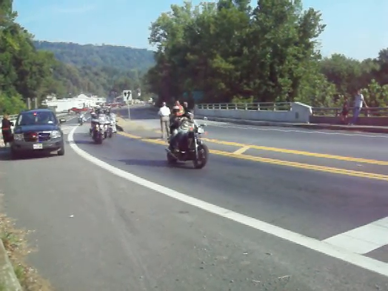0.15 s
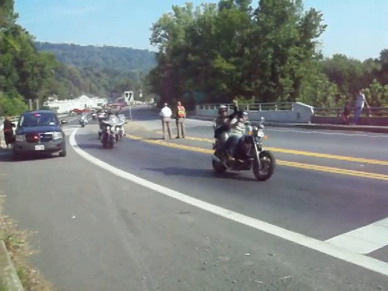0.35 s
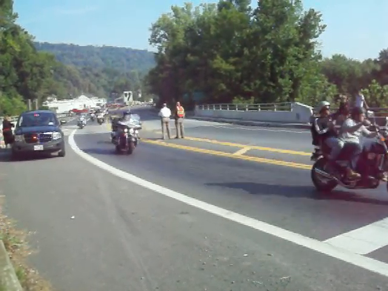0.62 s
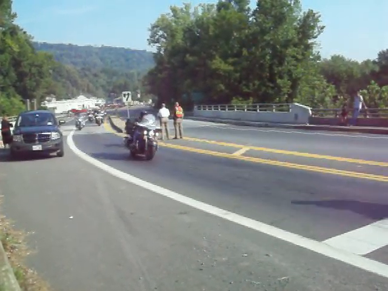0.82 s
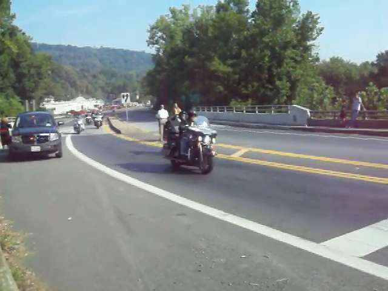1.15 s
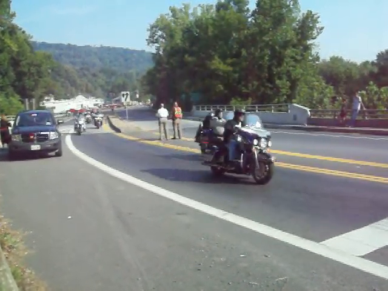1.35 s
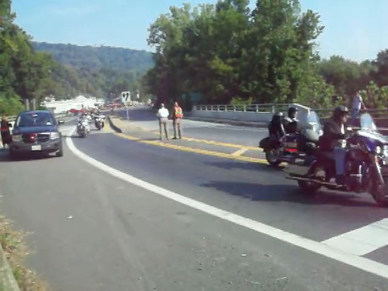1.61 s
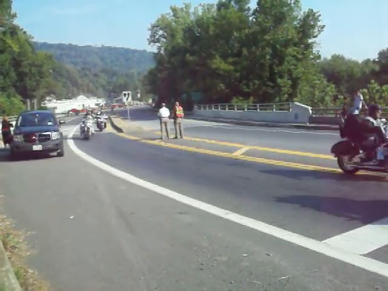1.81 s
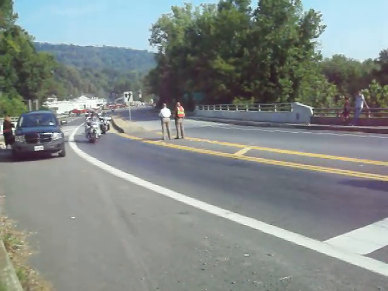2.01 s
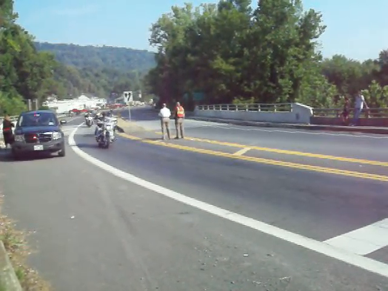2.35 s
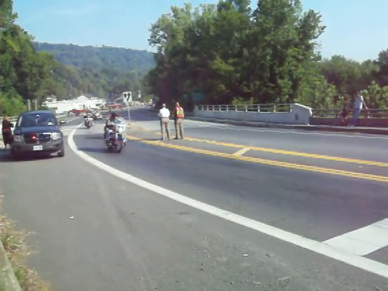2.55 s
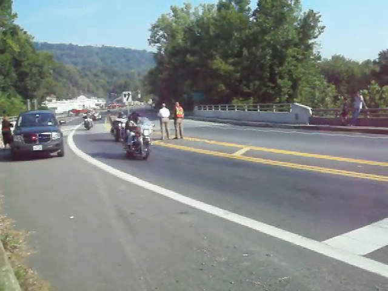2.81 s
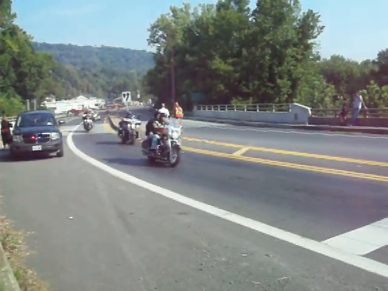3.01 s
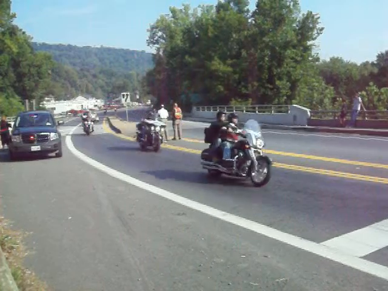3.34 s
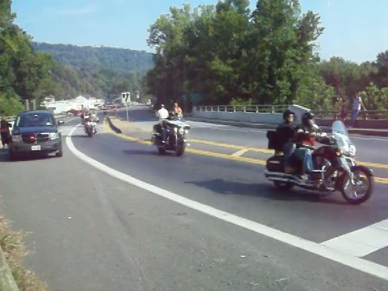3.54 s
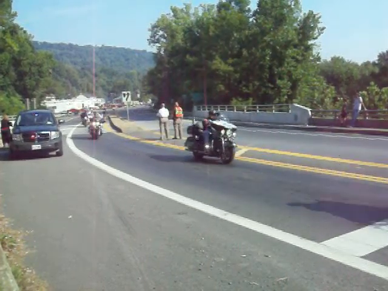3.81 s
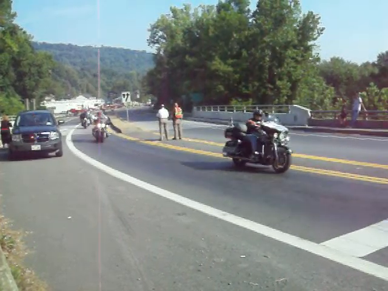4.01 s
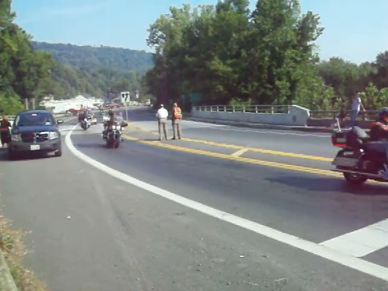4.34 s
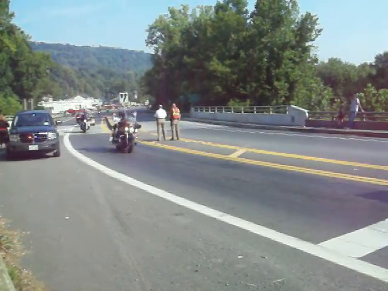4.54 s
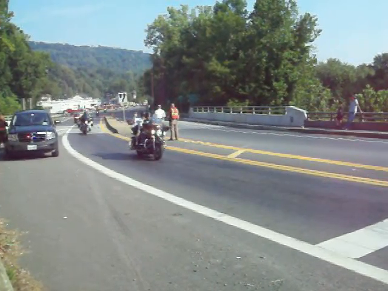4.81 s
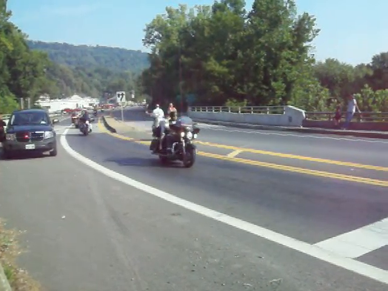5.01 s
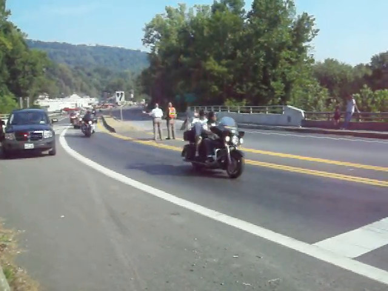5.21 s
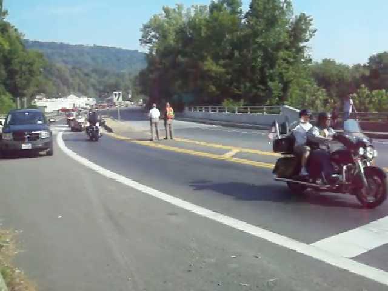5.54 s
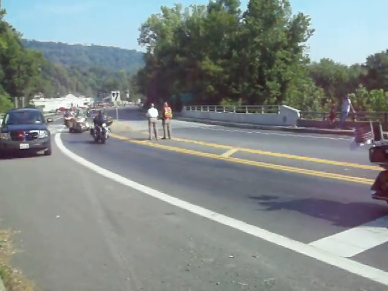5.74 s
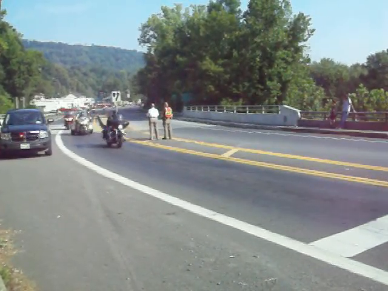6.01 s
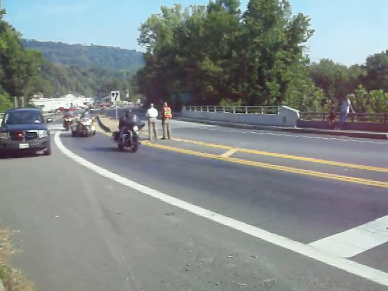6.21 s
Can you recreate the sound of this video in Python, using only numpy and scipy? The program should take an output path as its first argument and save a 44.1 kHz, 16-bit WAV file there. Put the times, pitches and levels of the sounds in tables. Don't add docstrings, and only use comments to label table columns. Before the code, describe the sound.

A column of heavy twin-cylinder motorcycles thunders by at a roadside bend, lumpy throbbing engines overlapping, distorted and continuous, over distant rumble.

```python
import sys
import numpy as np
from scipy import signal
from scipy.fft import rfft, irfft, next_fast_len
from scipy.io import wavfile
from scipy.ndimage import uniform_filter1d, map_coordinates

SR = 44100
rng = np.random.default_rng(int(sys.argv[2]) if len(sys.argv) > 2 else 0)


def how_loud(loudness_db):
    steps = np.asarray(loudness_db, float) / 20
    return 10 ** steps


def unload_audio(sound):
    columns = np.transpose(np.atleast_2d(sound))
    steps = np.round(np.clip(columns, -1, 1) * 32767)
    wavfile.write(sys.argv[1], SR, steps.astype(np.int16))


N = 281358
T = np.arange(N) / SR


def unit(x):
    return x / np.sqrt(np.mean(x ** 2) + 1e-20)


def along(points, hz):
    f, v = np.transpose(points)
    return np.interp(np.log(hz + 1), np.log(f + 1), v)


def curve(points):
    s, value = np.transpose(points)
    return np.interp(T, s, value)


def wobble(rate):
    coarse = np.arange(0, N + 32, 32)
    knots = rng.standard_normal(int(N * rate / SR) + 4)
    smooth = map_coordinates(knots, [coarse * rate / SR])
    return np.interp(np.arange(N), coarse, smooth)


def filtered(x, response):
    m = next_fast_len(N + SR // 4)
    return irfft(rfft(x, m) * response(np.fft.rfftfreq(m, 1 / SR)), m)[:N]


def noise(spectrum):
    return unit(filtered(rng.standard_normal(N), lambda hz: how_loud(along(spectrum, hz))))


def ring(hz, width_hz):
    return lambda f: 1j * f * width_hz / (hz * hz - f * f + 1j * f * width_hz)


def through(blows, response):
    early = 512
    pulse = np.roll(irfft(response(np.fft.rfftfreq(4096, 1 / SR))), early)
    return signal.oaconvolve(blows, pulse)[early:][:N]


def spell(start, end, rise, fade):
    return -rise * np.maximum(start - T, 0) - fade * np.maximum(T - end, 0)


# time in seconds, speed in cycles a second.
FIRST_SPEED = [(0, 21.65), (0.4, 22.6), (0.8, 23.65), (1.25, 24.54), (1.9, 26.0)]
SECOND_SPEED = [(.9, 21.6), (1.35, 21.7), (1.8, 21.1), (2.2, 18), (2.5, 16.8)]
THIRD_SPEED = [(1.9, 19.4), (2.6, 20), (3, 20.5), (3.5, 20.95), (4, 21.6), (4.5, 22.5), (5.1, 24.1),
               (5.6, 25.5), (5.8, 26.2), (6.38, 27.3)]
FOURTH_SPEED = [(2.4, 14.9), (3, 15.1), (3.6, 15.1), (4.1, 15.48), (4.5, 16.02), (4.95, 17.06), (5.5, 18.0),
                (6.38, 19.6)]
FIFTH_SPEED = [(2.3, 24.5), (2.8, 24.8), (3, 25.3), (3.4, 25.7), (3.6, 26.4), (4, 28.3), (4.6, 29.5)]
SIXTH_SPEED = [(4.9, 17.9), (5.25, 18.9), (5.6, 19.5), (6, 20.3), (6.38, 21.2)]
SEVENTH_SPEED = [(5.3, 15), (6.38, 14.5)]


def procession():
    return (bike(0, FIRST_SPEED, pipe(390, 0.002776, 1.3, 170, 1.5), lag=0.432,
                 rear_db=-1.1, rear_push=0.3, rasp_db=-11, tick_hz=3500, tick_db=-19)
            + bike(1, SECOND_SPEED, pipe(260, 0.00342, 1.6, 110, -18), lag=0.38,
                   rear_db=1, rear_push=0.48, rasp_db=-17, tick_hz=2500, tick_db=-36)
            + bike(2, THIRD_SPEED, pipe(390, 0.00267, 1.48, 150, -1.1), lag=0.43,
                   rear_db=-5, rear_push=0.57, rasp_db=-19, tick_hz=4230, tick_db=-22)
            + bike(3, FOURTH_SPEED, pipe(540, 0.00383, 0.81, 120, 3.1), lag=0.425,
                   rear_db=0.3, rear_push=1.05, rasp_db=-8.5, tick_hz=1800, tick_db=-35.5)
            + bike(4, FIFTH_SPEED, pipe(240, 0.0022, 2.2, 403, -6), lag=0.59,
                   rear_db=-10, rear_push=0.47, rasp_db=-28, tick_hz=4200, tick_db=-19.5)
            + bike(5, SIXTH_SPEED, pipe(500, 0.00271, 0.94, 135, 5), lag=0.43,
                   rear_db=0.5, rear_push=0.32, rasp_db=-4, tick_hz=1700, tick_db=-32)
            + bike(6, SEVENTH_SPEED, pipe(320, 0.0054, 0.29, 68, -2.3), lag=0.72,
                   rear_db=-11, rear_push=0.63, rasp_db=-10, tick_hz=2500, tick_db=-31))


def bike(place, speed, exhaust, lag, rear_db, rear_push, rasp_db, tick_hz, tick_db):
    cycles = turns(place, speed)
    puffs, ticks, swell = np.zeros(N), np.zeros(N), np.zeros(N)
    for shift, db, push in ((0, 0, 1), (lag, rear_db, rear_push)):
        turn = cycles - shift
        at = np.flatnonzero(np.diff(np.floor(turn)))
        chance = rng.standard_normal((len(at), 2))
        blows = np.zeros(N)
        blows[at] = how_loud(db + 2.4 * chance[:, 0])
        puffs += through(blows, lambda f: exhaust(f, push))
        ticks[np.minimum(at + 70, N - 1)] = how_loud(3 * chance[:, 1])
        swell += how_loud(db) * np.exp(-9 * ((0.06 - turn) % 1))
    exhaust_db, drone_db = loudness(place)
    chug = unit(puffs) + how_loud(rasp_db) * gas_rasp(swell) + how_loud(tick_db) * valves(place, ticks, tick_hz)
    rear = lambda f: exhaust(f, rear_push) * how_loud(rear_db)
    return how_loud(exhaust_db) * chug + how_loud(drone_db + 0.5) * drone(place, speed, cycles, exhaust, rear, lag)


FIRES = [.0446, 1.7468, 2.41, 3.7948, 3.003, 5.594, 5.51]


def turns(place, speed):
    cycles = np.cumsum(curve(speed)) / SR
    return cycles - cycles[round(FIRES[place] * SR)]


def pipe(puff_hz, echo_s, echo, boom_hz, boom_db):
    def response(f, push=1):
        puff = push * np.exp(-(f / puff_hz) ** 1.17)
        suck = echo * np.exp(-(f / (0.87 * puff_hz)) ** 1.04 - 2j * np.pi * f * echo_s)
        boom = how_loud(boom_db) * ring(boom_hz, 45)(f)
        return (puff - suck + boom) * (f / (f + 40)) ** 2
    return response


# start in seconds, end in seconds, exhaust level in dB, change in dB a second.
PASSES = [
    (0, 1.7, -20.5, -1),
    (1.05, 2.7, -21.5, 2),
    (2.08, 7.9, -21, -3),
    (2.58, 5.55, -27, 2.4),
    (2.38, 4.06, -28, 0),
    (5.05, 6.38, -24, -1.5),
    (5.5, 7.3, -34.5, 15.5),
]
# start in seconds, end in seconds, level of the fifth order in dB.
PULLS = [
    [(0, .45, -18), (.45, .85, -17.5), (.85, 1.2, -20.5), (1.2, 1.6, -23)],
    [(1.197, 1.75, -16.5), (1.8, 2.3, -19)],
    [(2.1, 2.9, -13.5), (2.9, 3.5, -15), (3.5, 4.1, -17.5), (4.1, 4.6, -16.5), (4.9, 5.3, -13),
     (5.7, 6.2, -17)],
    [(2.6, 3.05, -19), (3.05, 3.6, -18), (3.6, 4.2, -15.5), (4.2, 4.7, -18.5), (4.7, 5.3, -21),
     (5.3, 5.6, -16.5)],
    [(2.35, 3.1, -33.5), (3.2, 4.1, -31.5)],
    [(5.4, 5.8, -27), (5.8, 6.38, -25)],
    [(5.83, 6.05, -13.5)],
]


def loudness(place):
    start, end, db, change = PASSES[place]
    heard_db = spell(start, end, rise=89, fade=77.5)
    pulls_db = [level + spell(a, b, rise=52, fade=52) for a, b, level in PULLS[place]]
    exhaust_db = db + change * (np.clip(T, start, end) - start)
    return exhaust_db + heard_db, np.max(pulls_db, axis=0) + heard_db


# multiple of the cycle rate, level in dB against the fifth.
ORDERS_OF = [
    [(4, -11), (6, -8), (7, -15.5), (8, -10), (9, -13.5), (10, -5), (12, -10), (13, -18), (14, -15)],
    [(4, -11.5), (6, -8), (9, -3), (2, -12.5), (7, -18), (16, -12.5)],
    [(9, -12), (10, -13), (15, -10.5), (16, -18.5)],
    [(4, -13), (7, -26), (8, -10.5), (9, -7), (11, -13), (12, -13), (14, -17.5), (17, -10), (19, -14)],
    [(13, 4), (12, -1), (6, 3.5)],
    [(4, -11.5), (6, -2.5), (7, -1), (9, -3.5), (15, -11), (16, -7.5)],
    [(4, -10), (10, -12)],
]
UPPER_UNTIL = [1.6, 2.9, 3.85, 5.7, 4.1, 6.4, 7.3]


def drone(place, speed, cycles, front, rear, lag):
    drift = 0.067 * wobble(6)
    turned_db = spell(0, UPPER_UNTIL[place], rise=0, fade=30)
    rate = np.mean(np.transpose(speed)[1])
    out = np.zeros(N)
    for k, db in [(5, 0.014)] + ORDERS_OF[place]:
        step = np.angle(front(k * rate) + rear(k * rate) * np.exp(-2j * np.pi * k * lag))
        level_db = db + 1.2 * wobble(2) + (k > 5) * turned_db
        out += how_loud(level_db) * np.cos(2 * np.pi * k * cycles + step + drift)
    return out


# frequency in Hz, level in dB per Hz.
RASP = [(200, -44), (500, 19.5), (1000, 7.5), (2000, 2), (3500, -8), (6000, -31.5)]


def gas_rasp(swell):
    return unit(swell * how_loud(2.6 * wobble(60)) * noise(RASP))


TICKS_UNTIL = [1.7, 1.9, 6.3, 5.5, 3.6, 6, 8.4]


def valves(place, ticks, hz):
    burst = signal.lfilter([1], [1, -how_loud(-60 / SR / 0.009)], ticks) * rng.standard_normal(N)
    return unit(through(burst, ring(hz, 1500))) * how_loud(spell(0, TICKS_UNTIL[place], rise=0, fade=26.5))


# time in seconds, peak level in dB, gain dip after it in dB.
PUSHES = [(0.182, -8, 2.5), (0.537, -7.5, 2), (0.581, -9, -4), (0.6229, -3, 2), (1.0033, -7.5, 2),
          (1.1283, -10.5, 1), (1.3361, -11.5, 2.5), (1.3606, -10.5, 1.0), (1.3877, -14, 12),
          (1.5276, -5, 6), (1.5685, -9, 3.0), (1.605, -6, 1), (1.6313, -11.5, 6), (1.6784, -12.5, 9),
          (1.7738, -6.5, -2), (1.9672, -7.5, 6.5), (2.2341, -10.5, 7), (2.3168, -10.5, 11), (2.5226, -6, 4),
          (2.5781, -11, 5), (2.6448, -9.5, 4.5), (2.8071, -8.3, 2), (2.9559, -12, 1), (3.0415, -12, 5),
          (3.1026, -9, 3), (3.237, -11, 3.5), (3.4856, -7.5, 4), (3.4947, -7.5, 6), (3.7281, -8.5, 6.0),
          (3.8169, -6, 1.5), (3.9906, -9, 0.0), (4.0556, -4, 7), (4.1203, -5.5, 5.0), (4.1492, -10, 4),
          (4.211, -9, 2.5), (4.2773, -7, 5), (4.4995, -12.5, -4.5), (4.5264, -5, -2), (4.5617, -4, 9),
          (4.7107, -8.5, -2), (4.8323, -7.5, 4), (4.95, -10.5, 10), (5.0442, -10.2, 8), (5.1249, -5.5, -3),
          (5.1412, -9, 4.5), (5.2155, -4, 5), (5.2395, -10, 3), (5.384, -11.5, 4), (5.408, -8.5, 2.5),
          (5.4891, -5.5, 7), (5.5156, -11.5, 4), (5.551, -14.5, 12.5), (5.6104, -10.0, 3.5),
          (5.694, -11.5, -1), (5.7913, -11.5, 2), (5.8308, -9.5, 3), (5.9526, -7.5, -3), (6.1392, -8.5, 4),
          (6.2682, -10.5, 8), (6.3638, -7.5, 6.5)]
SUCKS = [(0.0669, -13.5, 4), (0.1576, -7.4, 2), (0.3377, -11, 5), (0.4505, -5.5, 1), (0.54, -7, 5),
         (0.5832, -5, 9.0), (0.7286, -14, 14), (0.841, -5.5, 2), (0.8564, -8, 3.5), (0.9234, -9.5, 13),
         (0.9653, -8.5, 7.5), (1.007, -11, 1), (1.0477, -11, 12), (1.1059, -10, 6), (1.1713, -4.5, 13),
         (1.252, -9, 12), (1.2999, -13, 1), (1.4131, -9, 1.5), (1.553, -3.5, 0), (1.6169, -12.5, 6.5),
         (1.7964, -8, 11), (1.8246, -6, 11), (1.8695, -5.5, 5), (1.92, -9, 10), (1.9419, -10.5, 5.5),
         (2.1508, -5.5, 11), (2.1796, -8.5, 5), (2.2612, -9, 13), (2.4122, -13, 8), (2.4463, -7, 4),
         (2.6102, -7.5, 4), (2.781, -7.5, 9), (2.819, -11, 5.5), (2.9078, -9.5, 2.0), (2.9567, -10.5, 2.5),
         (2.98, -5, 16.5), (3.148, -8, -2), (3.1619, -10, 8), (3.2947, -9, 8), (3.4226, -7.5, 9),
         (3.5618, -6, 6.5), (3.612, -7.5, 8.5), (3.6387, -7.5, 3), (3.6768, -4, 6), (3.7065, -8, 5.0),
         (3.8646, -8, 0), (3.9299, -11.5, 4), (3.9592, -6.5, 5), (4.503, -7.6, 5), (4.7899, -8.5, -5),
         (4.981, -5, 3), (5.1972, -8.5, 6), (5.3561, -12.5, 3.5), (5.456, -8.5, 5.0), (5.5923, -11, -3),
         (5.6164, -3.5, 5), (5.6659, -4.5, -2.5), (5.7956, -11.5, 14), (5.8511, -8, 7), (5.8896, -9.5, 3)]
# frequency in Hz, level in dB per Hz.
HISS = [(300, -20.5), (700, 3.5), (1200, 3), (2000, 3.5), (3000, 3.5), (4500, -5), (6000, -13.5)]


def hard_firings():
    blows = np.zeros(N)
    for sign, rows in ((0.7, PUSHES), (-0.79, SUCKS)):
        s, db, _ = np.transpose(rows)
        blows[np.round(s * SR).astype(int)] = sign * how_loud(db + 2.5)
    shape = lambda f: np.exp(-(f / 650) ** 2.03) * (f / (f + 90)) ** 2
    peak = irfft(shape(np.fft.rfftfreq(4096, 1 / SR)))[0]
    lead = signal.lfilter([1], [1, -np.exp(-1 / (0.0047 * SR))], np.abs(blows)[::-1])[::-1]
    return through(blows, shape) / peak + how_loud(-22.5) * lead * noise(HISS)


def column_dips():
    marks, t = np.zeros(N), np.arange(-200, 201) / SR
    marks[[round(row[0] * SR) for row in PUSHES + SUCKS]] = 1
    cover = np.convolve(marks, np.exp(-(t / 0.0011) ** 2), "same")
    return 1 - np.clip(0.5 * cover, 0, 1)


# time in seconds, peak level in dB, pitch in Hz.
POPS = [(2.432, -22.5, 2900), (2.507, -25, 1340), (2.6807, -16, 2990), (2.709, -23, 1520),
        (2.9535, -17.5, 1350), (3.193, -25.5, 1555), (3.265, -27, 1510), (4.2962, -15.5, 2250),
        (4.3547, -18, 1346), (4.6441, -11, 1494), (4.7007, -12.5, 1950), (4.844, -16.5, 1385),
        (4.9768, -10, 1320), (2.4802, -27.5, 2705), (2.508, -21, 4730), (2.53, -24, 2700),
        (2.532, -26.5, 4510), (2.6092, -21, 4330), (2.6317, -25.5, 2840), (2.708, -22, 4600),
        (2.759, -24, 4200), (2.878, -25, 4270), (2.904, -22, 1330), (2.927, -23.5, 4200),
        (2.9753, -27.5, 2310), (3.0716, -22, 1350), (3.4878, -23.5, 1325), (3.5266, -20.5, 1200),
        (3.557, -20.5, 1910), (4.176, -24.5, 2500), (4.236, -20, 1486), (4.7333, -14, 1017),
        (5.0347, -12, 1400), (5.262, -19, 2030), (5.281, -13.5, 1920), (5.29, -16.5, 906),
        (5.293, -14.5, 989.2), (5.311, -15.5, 1300), (3.161, -21.5, 1504), (3.224, -24, 1450),
        (3.291, -29.5, 1534), (3.326, -23, 1500), (3.35, -22.5, 1604), (4.116, -30.5, 2225),
        (5.8459, -13.5, 1240), (5.944, -14, 1990), (6.013, -18, 1800), (6.042, -15.5, 2150),
        (6.16, -20.5, 3000), (6.303, -16, 2030), (6.331, -17, 2305), (6.349, -24.5, 3610),
        (4.891, -20.5, 1350), (5.066, -14, 1450), (5.0871, -13.5, 1340), (5.118, -15.5, 1687),
            (5.1425, -16, 1430), (5.1742, -9.5, 1406), (5.1963, -18.5, 1345), (5.227, -14.5, 1450),
            (5.249, -14, 1600), (5.273, -13, 1450), (5.303, -16.5, 2160), (5.356, -12, 1320),
            (5.3849, -12, 1720), (5.408, -10, 1345), (5.437, -13.5, 1844), (5.465, -23.5, 1440),
            (5.488, -24, 1690), (5.5107, -12, 2060), (5.5405, -12, 1580), (5.563, -26, 1750),
            (5.5922, -8.5, 1530), (5.6145, -12.5, 1680), (5.6432, -18.5, 1410), (5.663, -21.5, 2500),
            (5.6926, -10.5, 1337), (5.716, -22, 1620), (5.7445, -15, 1726), (5.765, -25, 1405),
            (5.8156, -22, 2040), (5.8662, -23, 2180), (5.8945, -20.5, 1420), (5.918, -22.5, 2940),
            (5.9638, -22, 1990), (6.11, -24.5, 2660), (6.1865, -23.5, 2300), (6.2068, -20.5, 1410),
            (6.282, -19, 2710),
        (0.855, -24.5, 1360), (0.876, -24.5, 1350), (0.9215, -23.5, 1580), (0.9394, -23.5, 1460),
                  (0.9628, -18, 1550), (0.981, -22.5, 1594), (1.004, -20.5, 1424), (1.0635, -23.5, 1510),
                  (1.0985, -17.5, 1800), (1.1475, -22, 1580), (1.2515, -22.5, 1860), (1.2715, -23.5, 1430),
                  (1.291, -20, 1264), (1.3226, -20, 1620), (1.3529, -19, 1560), (1.4523, -21, 1280),
                  (1.601, -16.5, 1320), (1.6501, -25, 1750), (1.8634, -22, 1410), (2.071, -22, 2910),
                  (2.1768, -19.5, 2870), (2.218, -25, 2260), (2.2902, -21, 2040), (2.308, -22, 1850)]
VALVE_TICKS = [(2.3511, -27.5, 3930), (2.4094, -27, 4390), (2.4438, -22, 4510), (2.5576, -30.5, 4410),
               (2.7786, -29, 3930), (2.9048, -28, 3710), (2.9482, -19.5, 4040), (3.0026, -21.5, 4980),
               (3.0245, -29.5, 4250), (3.0724, -23, 4520), (3.1198, -29.5, 4060), (3.1433, -32, 4200),
               (3.2176, -33.5, 4080), (3.2929, -25.5, 4860), (3.4092, -30, 4520)]


def pops():
    out, t = np.zeros(N + 500), np.arange(500) / SR
    for s, db, hz in POPS + VALVE_TICKS:
        crack = np.sin(2 * np.pi * hz * t) + 0.36 * rng.standard_normal(len(t))
        envelope = how_loud(db + 4.5 - 60 * t / 0.0069) * (1 - np.exp(-t / 0.000053))
        out[round(s * SR):][:len(t)] += envelope * crack
    return out[:N]


# start in seconds, end in seconds, pitch in Hz, level in dB.
HUM = (1.3, 2, 81, -17.5)


def hum():
    start, end, hz, db = HUM
    return how_loud(db + spell(start, end, rise=52, fade=52)) * np.sin(2 * np.pi * hz * T)


# time in seconds, rumble level in dB.
FAR = [(0, -23), (.6, -17.5), (1.2, -17), (1.9, -16), (2.7, -20.5), (3.3, -17), (4, -20.5), (4.6, -18),
       (5.3, -16.5), (5.9, -15.5), (6.38, -12)]
# frequency in Hz, level in dB per Hz.
RUMBLE = [(15, -51), (25, -8), (80, -3.5), (104, -2), (248, -9.5), (321, -7), (368, -14), (637, -21.5),
          (852, -19), (1050, -31), (1500, -32.5), (1950, -80), (3300, -120)]


def far_traffic():
    rumble_db = curve(FAR)
    hiss_db = -38 + 0.96 * (rumble_db - rumble_db.mean())
    rumble = unit(how_loud(1.3 * wobble(25)) * noise(RUMBLE))
    hiss = unit(how_loud(3 * wobble(40)) * noise(HISS))
    return how_loud(rumble_db) * rumble + how_loud(hiss_db) * hiss


def scene():
    column = procession() + hum() + far_traffic()
    return (column * column_dips() + hard_firings() + pops())[None]


def gain_control(x, level_db, window_s, grip):
    power = np.abs(uniform_filter1d(x * x, int(window_s * SR))) + 1e-8
    return x * (how_loud(level_db) / np.sqrt(power)) ** grip


# time in seconds, count of wrapped samples, spacing in converter samples.
EARLY_OVERFLOWS = [(0.04451, 2, 3), (0.09023, 1, 0), (0.13574, 3, 2), (0.22628, 2, 6), (0.271, 2, 10),
                   (0.31587, 2, 2), (0.3166, 2, 2), (0.36116, 1, 0), (0.40505, 2, 1), (0.40541, 1, 0),
                   (0.49338, 3, 2), (0.66601, 2, 5), (0.70909, 2, 3), (0.75154, 2, 5), (0.79444, 1, 0),
                   (1.21023, 1, 0), (1.74692, 2, 2)]
LATE_OVERFLOWS = [(3.39018, 1, 0), (3.79478, 2, 1), (3.86039, 2, 2), (3.92524, 1, 0), (4.18456, 1, 0),
                  (4.2485, 1, 0), (4.31172, 2, 4), (4.33821, 2, 5), (4.37503, 1, 0), (4.40179, 1, 0),
                  (4.43726, 2, 9), (4.62438, 1, 0), (4.68551, 2, 2), (4.74546, 2, 2), (4.74619, 1, 0),
                  (4.80633, 2, 2), (4.86583, 1, 0), (4.92394, 2, 1), (5.0085, 1, 0), (5.10039, 1, 0),
                  (5.32868, 1, 0), (6.08853, 2, 3), (6.08898, 1, 0)]
STEP, GRID = 4, 3
FULL, RAIL = 0.73, 0.69


def peak_dips():
    dips = [(s, dip) for s, _, dip in PUSHES + SUCKS]
    dips += [(row[0], 3.5) for row in EARLY_OVERFLOWS + LATE_OVERFLOWS]
    s, dip_db = np.transpose(dips)
    delay_s, recover_s = 0.002, 0.011
    at = np.round((s + delay_s) * SR).astype(int)
    kicks = np.bincount(at, np.maximum(dip_db, 0), N)[:N]
    sag_db = signal.lfilter([1], [1, -np.exp(-1 / (recover_s * SR))], kicks)
    return how_loud(-uniform_filter1d(sag_db, size=60))


def convert(x, slope_s, reach_s, hold_s, grain_db):
    loud = np.sqrt(np.abs(uniform_filter1d(x * x, 200)))
    grain = how_loud(grain_db) * loud ** 0.65 * rng.standard_normal(N)
    slow = (x + grain)[GRID::STEP]
    slow /= (1 + np.abs(slow / (1.02 * FULL)) ** 6) ** (1 / 6)
    t = (np.arange(len(slow)) * STEP + GRID) / SR
    wrapped = []
    for s, count, spacing in EARLY_OVERFLOWS + LATE_OVERFLOWS:
        wraps = round((s * SR - GRID) / STEP) + int(spacing) * np.arange(int(count))
        near = slice(wraps[0] - 50, wraps[-1] + 50)
        before, after = t[wraps[0]] - t[near], t[near] - t[wraps[-1]]
        away = np.maximum(np.maximum(before, after - hold_s), 0)
        crest = RAIL * np.clip(1.12 - away / slope_s, -0.2, 1)
        slow[near] += np.maximum(crest - slow[near], 0) * np.exp(-(away / reach_s) ** 2)
        wrapped += list(wraps)
    slow[wrapped] = -RAIL
    return slow


def band_limit(x):
    return signal.sosfilt(signal.butter(12, 16810, fs=SR, output="sos"), x)


def record(dry):
    band = filtered(dry[0], lambda hz: hz < SR / STEP / 2)
    x = gain_control(band, level_db=-14, window_s=0.12, grip=0.72)
    offset = 0.005
    fast = np.zeros(N)
    fast[GRID::STEP] = STEP * convert(x * peak_dips() + offset, slope_s=0.00063, reach_s=0.0019,
                                      hold_s=0.0003, grain_db=-38.5)
    smooth = filtered(fast, lambda hz: np.clip((5900 - hz) / 700, 0, 1))
    full = np.clip(smooth, -FULL, FULL)
    mix = filtered(full, lambda hz: np.clip((16800 - hz) / 1500, 0, 1))
    return band_limit(mix[None])


dry = scene()
out = record(dry)
unload_audio(out)
```